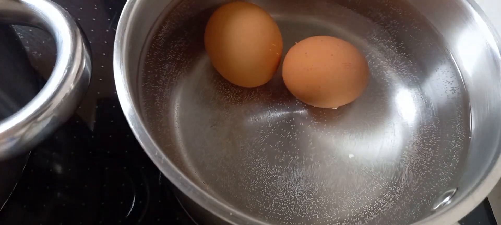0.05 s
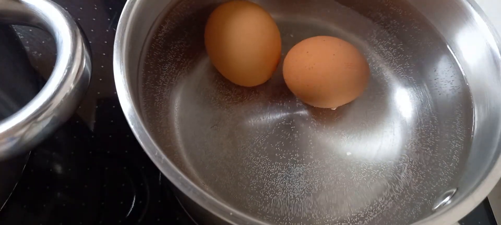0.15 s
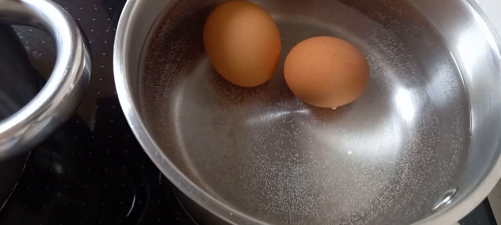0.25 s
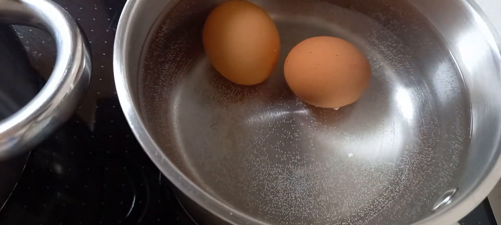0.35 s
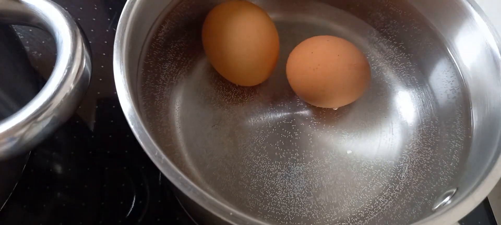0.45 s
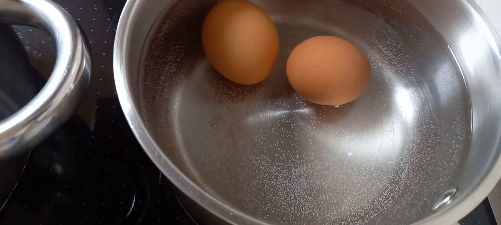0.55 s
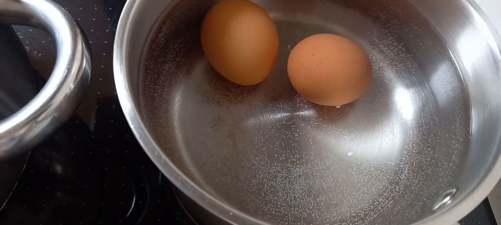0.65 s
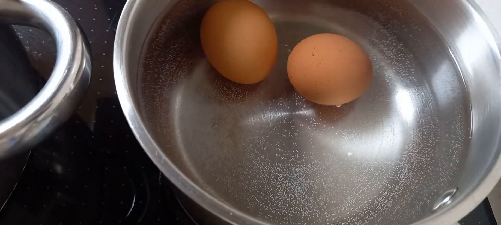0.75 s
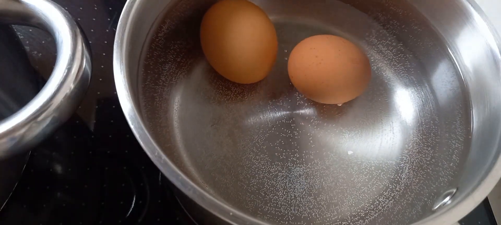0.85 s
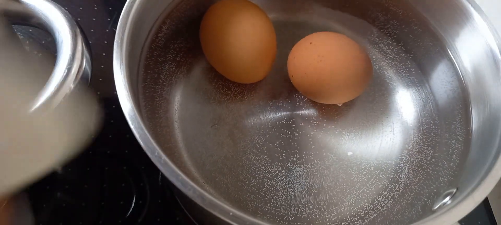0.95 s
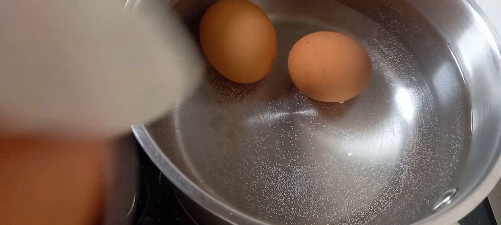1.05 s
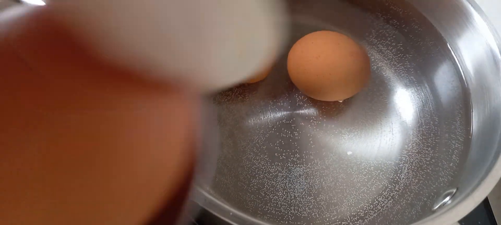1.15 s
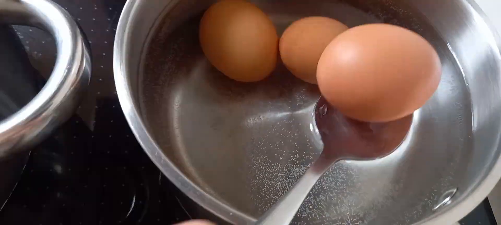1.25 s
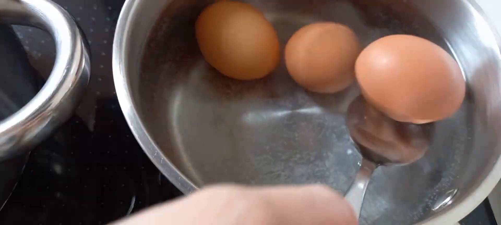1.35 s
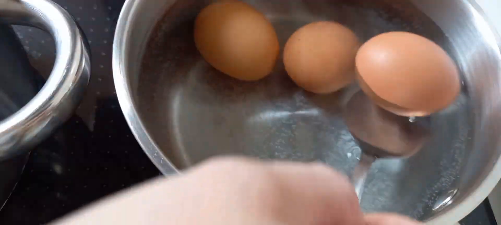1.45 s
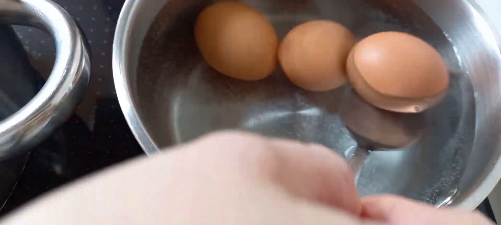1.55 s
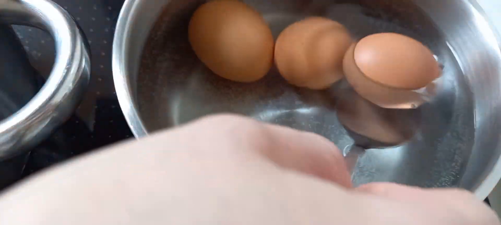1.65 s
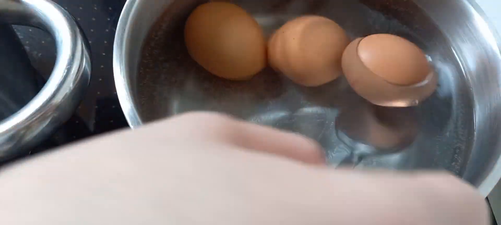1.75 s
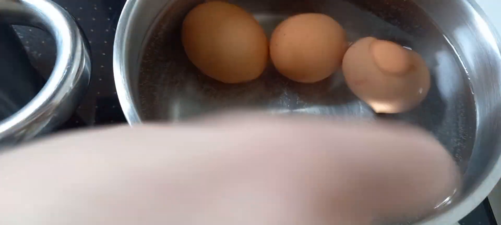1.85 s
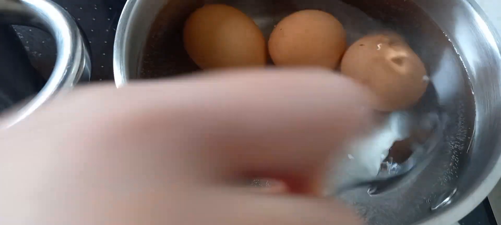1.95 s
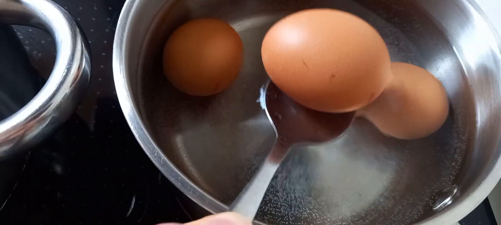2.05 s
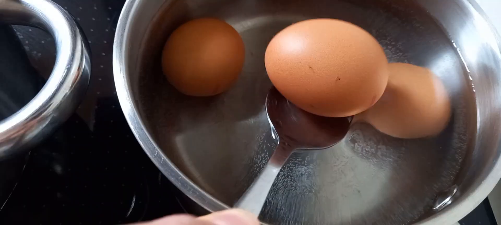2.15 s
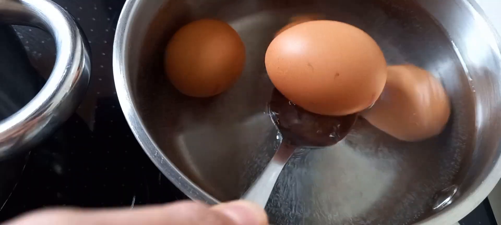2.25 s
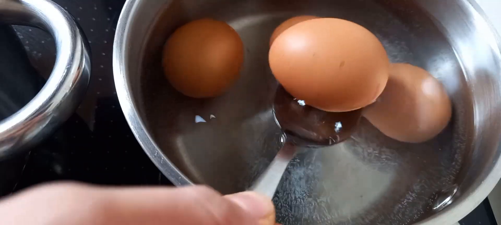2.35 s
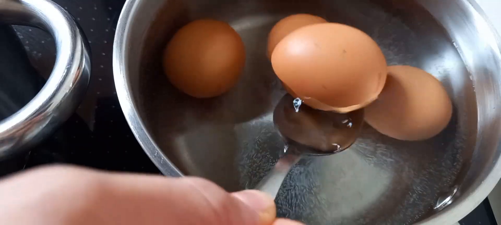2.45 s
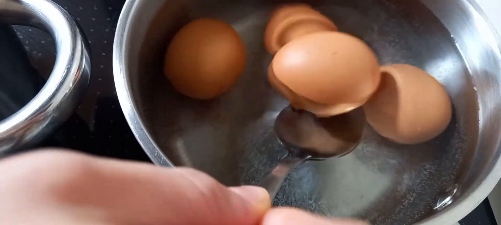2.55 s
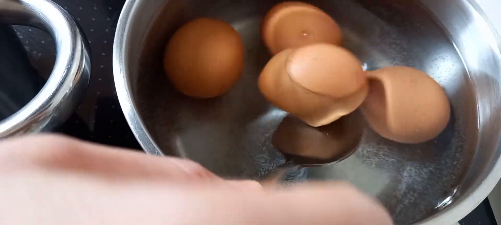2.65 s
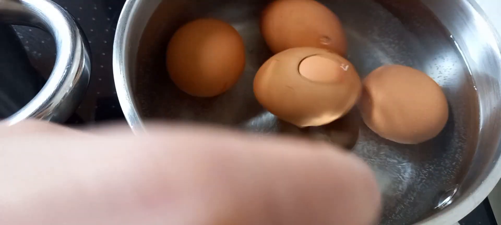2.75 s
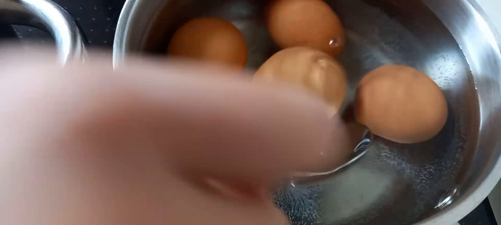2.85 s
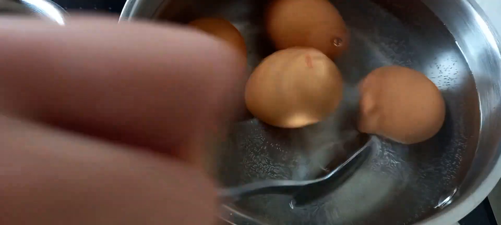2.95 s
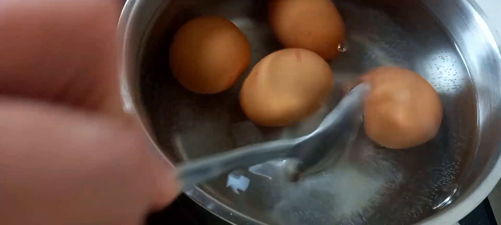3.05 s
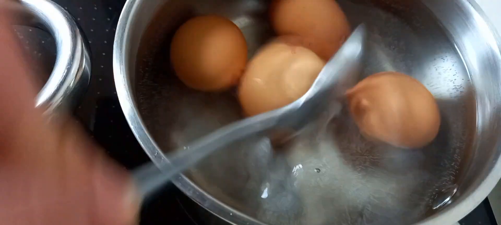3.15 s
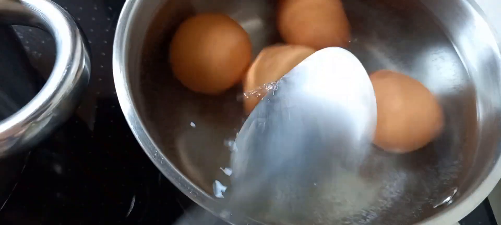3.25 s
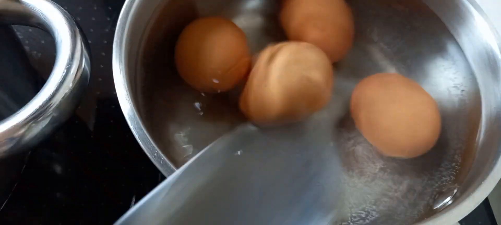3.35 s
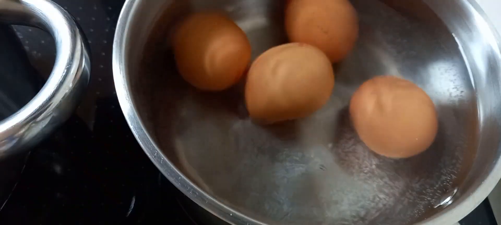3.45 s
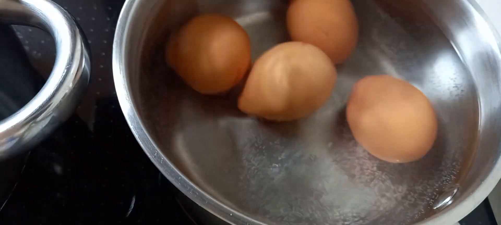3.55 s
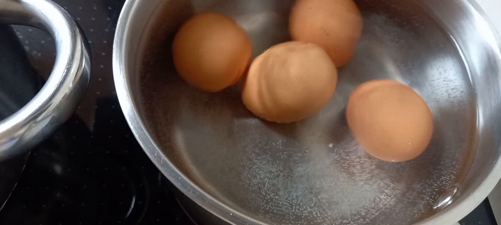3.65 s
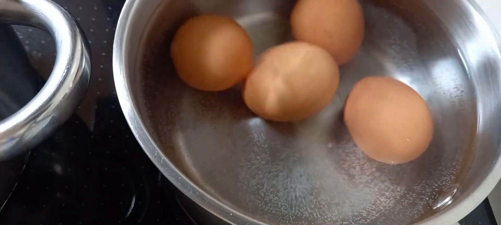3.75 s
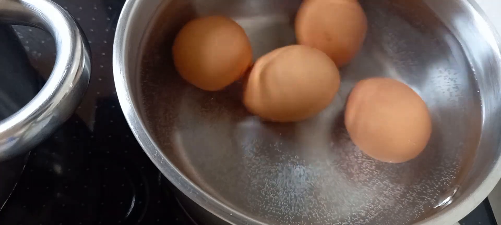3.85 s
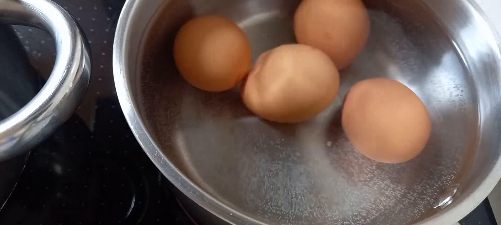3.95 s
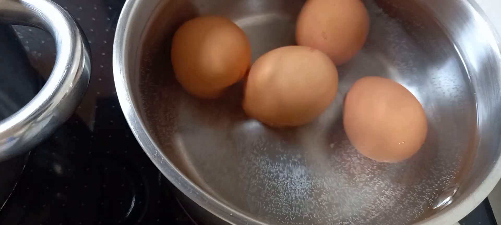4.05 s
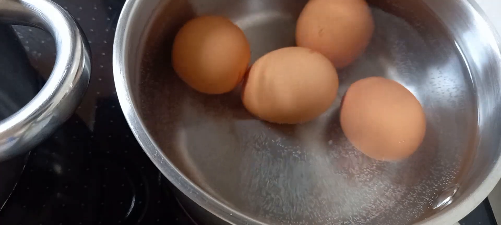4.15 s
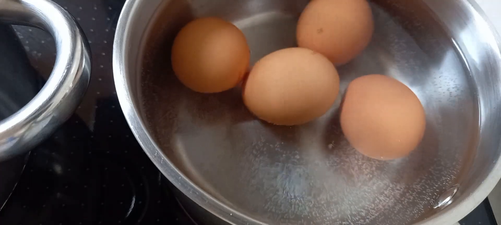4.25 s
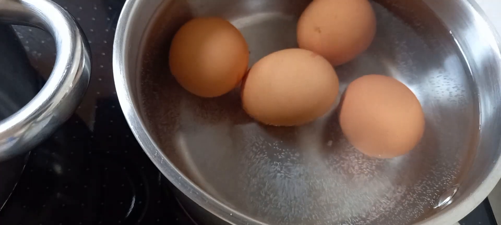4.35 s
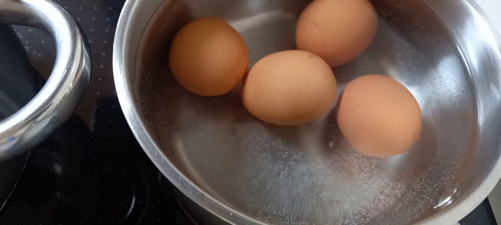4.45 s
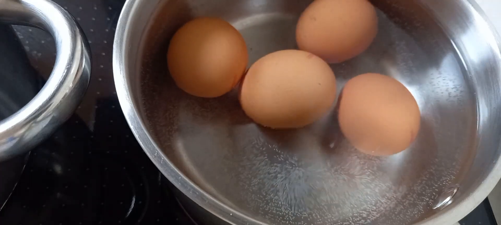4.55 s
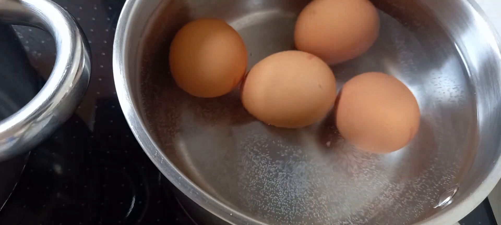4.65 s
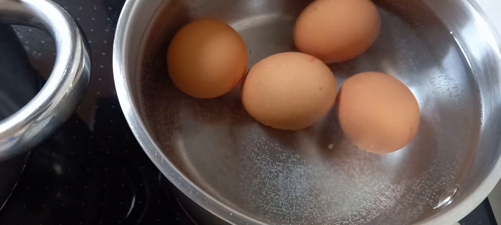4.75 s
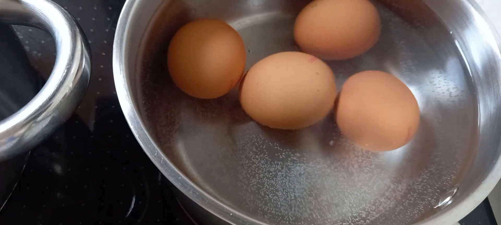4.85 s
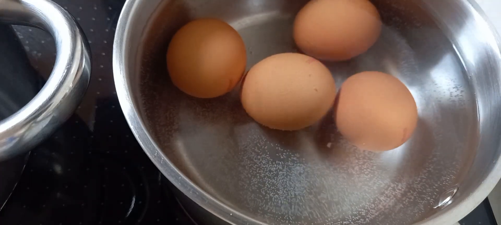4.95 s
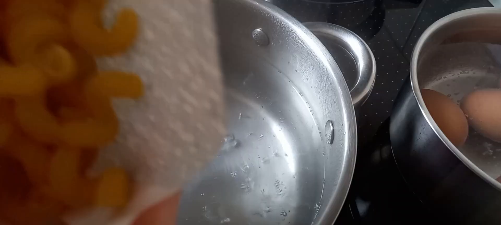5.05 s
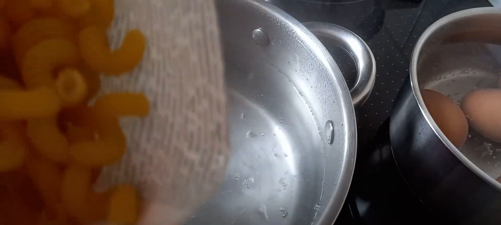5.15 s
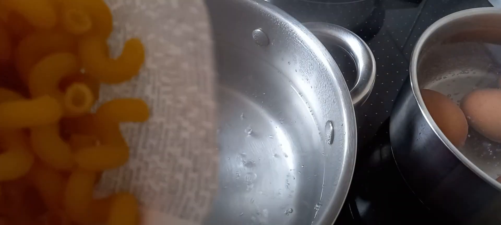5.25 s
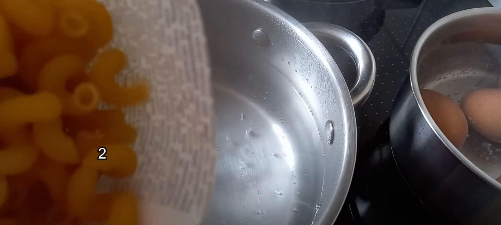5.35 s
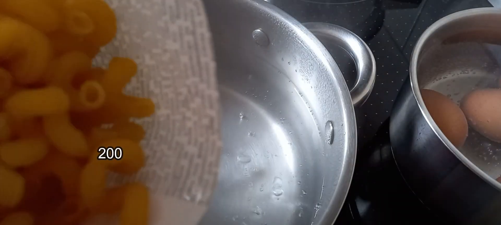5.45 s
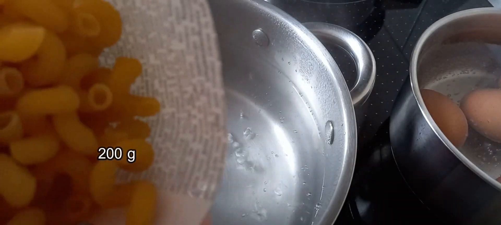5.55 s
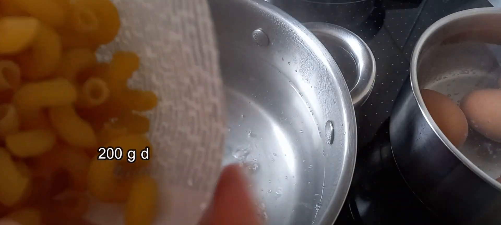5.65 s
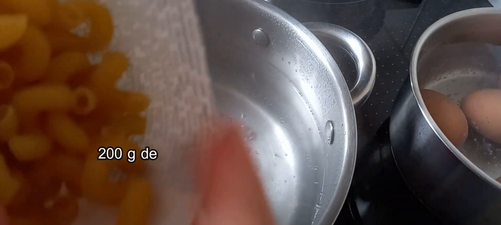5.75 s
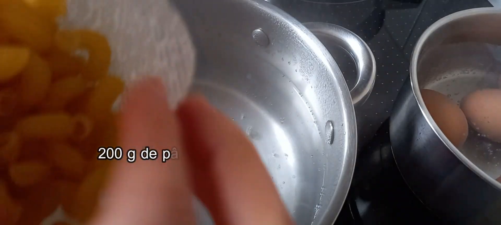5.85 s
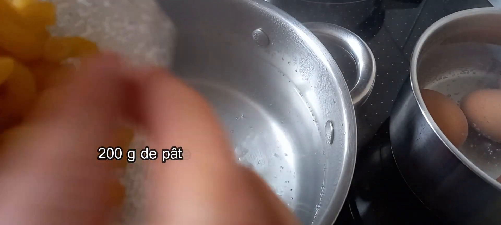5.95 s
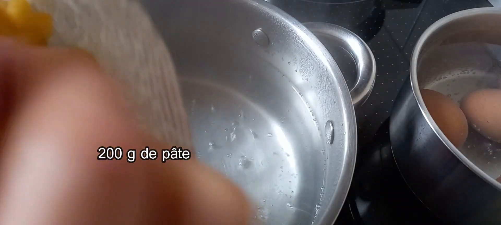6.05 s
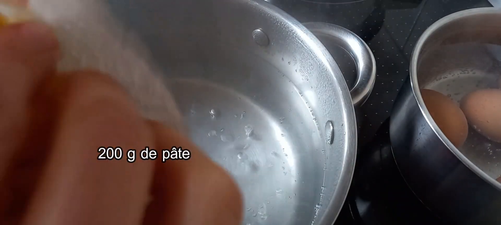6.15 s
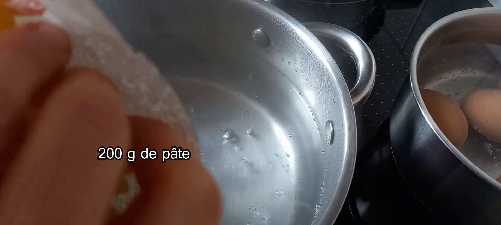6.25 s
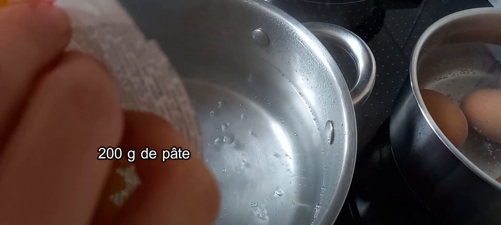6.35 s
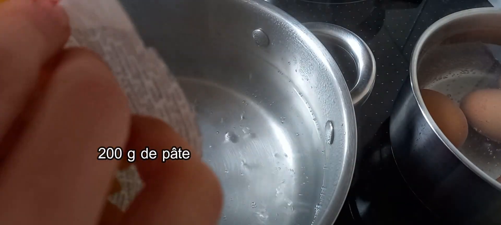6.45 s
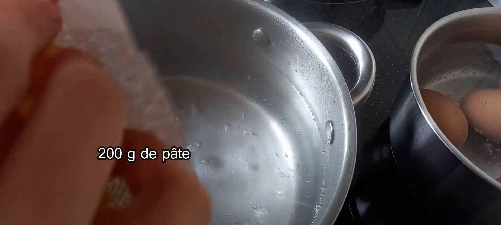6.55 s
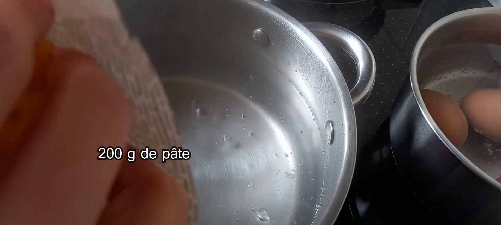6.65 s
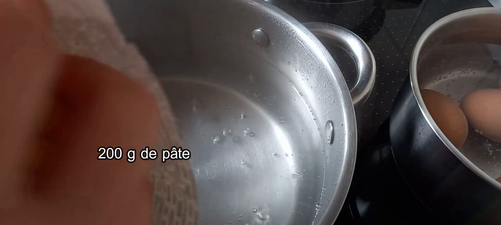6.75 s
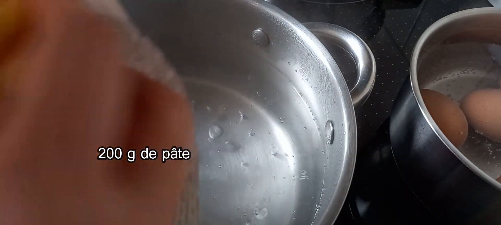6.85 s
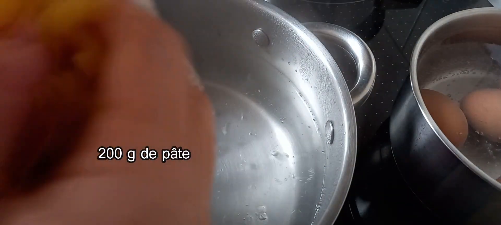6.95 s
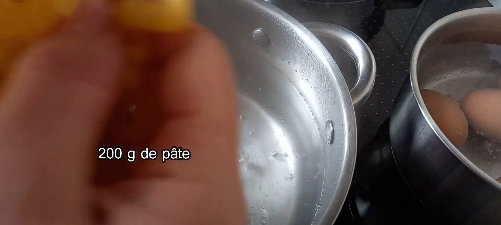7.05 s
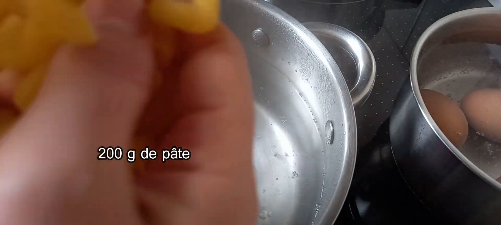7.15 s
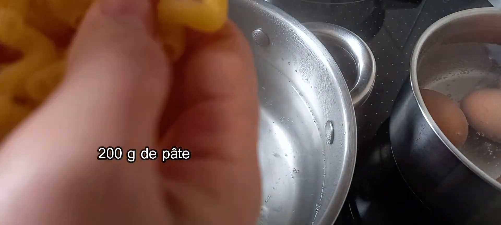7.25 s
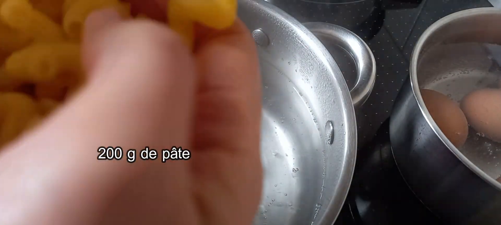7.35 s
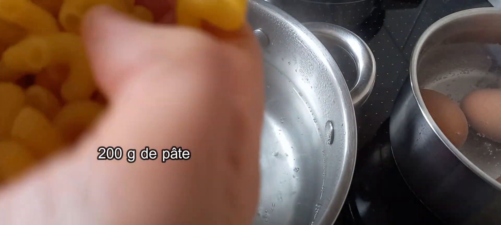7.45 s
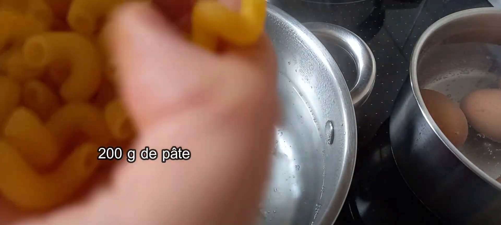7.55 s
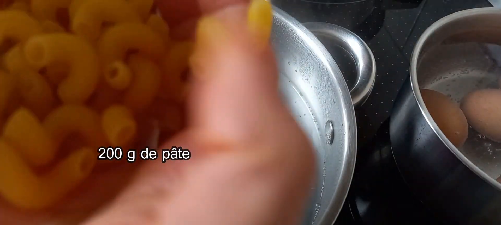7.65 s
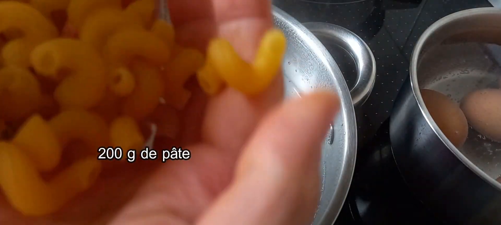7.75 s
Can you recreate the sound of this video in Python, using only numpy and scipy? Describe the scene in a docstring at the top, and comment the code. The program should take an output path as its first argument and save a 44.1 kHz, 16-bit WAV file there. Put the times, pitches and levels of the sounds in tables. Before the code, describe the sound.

Quiet kitchen: muffled egg clunks and faint water swishes in a saucepan, then abruptly a hand rummages noisily through a bag of dry macaroni.

```python
"""In a kitchen, eggs are lowered on a spoon into a steel saucepan of water: struck tones and clicks make
their knocks and the spoon's ticks, noise makes swishes and hiss, steady tones the hob's whine and a low hum.
Then, close by and to the left, a hand digs into a plastic bag of dry macaroni above an empty steel pot:
crowds of tiny resonant clicks make film and pasta crackle and rattle, sharper clicks make the film snap,
and the pot rings faintly along."""
import sys
import numpy as np
from scipy import signal
from scipy.fft import rfft, irfft
from scipy.io import wavfile
from scipy.ndimage import uniform_filter1d

SR = 44100
rng = np.random.default_rng(int(sys.argv[2]) if len(sys.argv) > 2 else 0)


def generate_wav(signal):
    """Clip the signal to [-1, 1] and save it as 16-bit WAV at the path in sys.argv[1]."""
    frames = np.transpose(np.atleast_2d(signal))
    scaled = np.clip(frames, -1, 1) * 32767
    pcm = np.round(scaled).astype(np.int16)
    wavfile.write(sys.argv[1], SR, pcm)


N = 343098
TIME = np.arange(N) / SR
AGE = TIME[:SR // 2]   # seconds since a sound began

EGGS_END_S, BAG_START_S = 5.089, 5.117

# The loudest clicks of the bag; the first is the abrupt start of the bag scene.
# Each row: start in seconds, peak level in dB, thump level in dB, treble boost or cut in dB.
LOUD_CLICKS = [(5.119, -11.5, -18, 16.5), (5.257, -6.5, -23, 8), (5.316, -0.5, -29, 2),
               (5.461, -17.5, -63, -29), (5.473, -10, -69, 13), (5.495, -11, -43, 0),
               (5.725, -10.5, -27, 4), (5.754, -10.5, -25, -5.5), (5.823, -7.5, -28, 0),
               (5.851, -5, -21, 1), (5.956, -16, -50, 4), (6.051, -7, -16, -5.5), (6.145, -2.5, -19.5, 4),
               (6.2, -10.5, -44, -1), (6.215, -6, -23, -10), (6.338, -2.5, -43, 1), (6.366, -6.5, -57, 2.5),
               (6.382, -8, -46, 16), (6.41, -8, -40, 0), (6.458, -8.5, -42, 1), (6.54, -2, -36, 12),
               (6.558, -2.5, -12, -32), (6.837, -10, -27, 20), (6.97, -6, -24, 24), (7.03, -11, -32, 14),
               (7.056, -11.5, -33, 10), (7.326, -2.5, -20.5, 1), (7.362, -7, -34, 8.5),
               (7.375, -5.5, -31, 12.5)]


def from_db(db):
    """Decibels to gain."""
    return 10 ** (np.asarray(db) / 20)


def rms_one(x):
    """Scale to unit power."""
    return x / np.sqrt(np.mean(x ** 2) + 1e-20)


def peak_one(x):
    """Scale to unit height."""
    return x / np.abs(x).max()


def in_time(rows):
    """Draw straight lines through (seconds, dB) points, with a value at every sample."""
    s, db = np.transpose(rows)
    return np.interp(TIME, s, db)


def dying(t60):
    """Envelope that falls 60 dB in t60 seconds."""
    return np.exp(-np.log(1000) * AGE / max(t60, 1e-4))


def swell(s, length, attack_s, release_s):
    """Rise from time s, hold until length has passed, then fall 60 dB in release_s."""
    rise = np.clip((TIME - s) / max(attack_s, 1e-4), 0, 1)
    fall = np.clip((TIME - s - length) / max(release_s, 1e-4), 0, 2)
    return rise * np.exp(-np.log(1000) * fall)


def drift(rate):
    """Random wandering of spread 1 with about `rate` turns a second."""
    return rms_one(np.interp(TIME * rate, np.arange(4096), rng.standard_normal(4096)))


def through(x, response):
    """Convolve, keeping the length."""
    full = signal.fftconvolve(np.atleast_2d(x), np.atleast_2d(response), axes=-1)
    return full[:, :x.shape[-1]]


def colour(x, points, size=4096):
    """Filter through (Hz, dB) points without sounding ahead of time (minimum phase)."""
    hz, db = np.transpose(points)
    grid = np.maximum(np.arange(size // 2 + 1) * SR / size, 1)
    gain = from_db(np.interp(np.log(grid), np.log(hz), db))
    # fold the cepstrum onto positive times
    cepstrum = irfft(np.log(gain))
    cepstrum[1:size // 2] *= 2
    cepstrum[size // 2 + 1:] = 0
    return through(x, irfft(np.exp(rfft(cepstrum)))).reshape(x.shape)


def resonate(x, hz, width_hz):
    """Band resonance with gain about 1 on top."""
    r = np.exp(-np.pi * width_hz / SR)
    top = np.array([1, 0, -1]) * (1 - r * r) / 2
    bottom = [1, -2 * r * np.cos(2 * np.pi * hz / SR), r * r]
    return signal.lfilter(top, bottom, x + 1e-18)


def struck(modes):
    """One blow: every mode rings and dies at its own pace, with a slightly different strength each time."""
    return sum(from_db(db + 2 * rng.normal()) * np.sin(2 * np.pi * hz * AGE) * dying(t60)
               for hz, db, t60 in modes)


def crack(t60, grit):
    """A sharp click followed by a brief gritty splinter of noise."""
    return (AGE == 0) + grit * rng.standard_normal(len(AGE)) * dying(t60)


def sides(pan_db):
    """Left and right gains that differ by pan_db; positive leans left."""
    return from_db(np.array([[pan_db], [-pan_db]]) / 2)


def add(out, s, sound):
    """Mix a sound in at time s."""
    i = round(s * SR)
    out[..., i:i + sound.shape[-1]] += sound[..., :N - i]


def later(x, s):
    """Delay by s seconds."""
    return np.pad(x, (max(round(s * SR), 0), 0))[:len(x)]


def kitchen(x, early_db, early_t60):
    """Dense near reflections from pan, hob and wall plus a room tail, as decaying noise of unit energy."""
    near, far = rng.standard_normal((2, 2, len(AGE)))
    tail = colour(far, [(100, 7), (500, 3.5), (6000, 6.0), (16000, -6.0)]) * dying(t60=0.27)
    early = from_db(early_db) * near * dying(early_t60)
    response = (tail + early) * (AGE > .002)
    return through(x, rms_one(response) / np.sqrt(len(AGE)))


def hob():
    """A thin wavering tone whines, filtered noise makes a faint high hiss and the air of the room."""
    # Level of the faint high hiss, which drops after louder sounds.
    # Each row: time in seconds, level in dB before a 7 dB lift.
    hiss_level = [(0.0, -94.5), (0.93, -83.5), (1.19, -83), (1.41, -93.5), (3.07, -92), (3.61, -84),
                  (4.05, -83), (4.21, -89.5), (5.05, -84.5)]
    # Tone of the hiss. Each row: frequency in Hz, relative level in dB.
    hiss_tone = [(2000, -12.5), (6000, -18.5), (7000, -13.5), (8200, -4), (9500, -12), (11000, -14.5),
                 (16000, -16.5)]
    # Tone of the room's air. Each row: frequency in Hz, relative level in dB.
    air_tone = [(18, -67), (30, -19.5), (87, 3.5), (162, -11), (241, -10.5), (747, -27), (816, -17.5),
                (1480, -28.5), (1730, -25.5), (1980, -34), (6000, -44.5), (7800, -60), (13200, -120)]
    rise = np.clip((TIME - 1.23) / 0.53, .2, 1)   # the whine waits at a fifth of its strength, then grows
    whine_turn = 2 * np.pi * np.cumsum(1790 + 3 * drift(40)) / SR   # around 1790 Hz
    whine = rise * from_db(-81.5 + 2.6 * drift(13)) * np.sin(whine_turn)
    hiss = from_db(in_time(hiss_level) + 7) * rms_one(colour(rng.standard_normal((2, N)), hiss_tone))
    air_noise = rng.standard_normal((2, N)) + 0.77 * rng.standard_normal(N)   # partly shared by both sides
    air = from_db(-67) * rms_one(colour(air_noise, air_tone))
    return whine + hiss + air


def hum():
    """A low wavering tone with a weak octave swells and fades; the strongest swell sets its pitch."""
    # The swells. Each row: start in seconds, length in seconds, frequency in Hz, level in dB.
    hum_rows = [(0.0, .15, 70.6, -48), (0.146, 0.54, 66, -54), (0.413, 0.13, 66, -49),
                (1.627, 0.29, 76.5, -56.5), (2.047, 1.27, 86.6, -58), (2.868, 0.36, 85.4, -50)]
    swells = np.array([from_db(db) * swell(s, length, attack_s=0.026, release_s=.3)
                       for s, length, hz, db in hum_rows])
    hz = np.array(hum_rows)[swells.argmax(axis=0), 2]
    turn = 2 * np.pi * np.cumsum(hz) / SR
    level = swells.max(axis=0) * from_db(2 * drift(8))
    octave = from_db(-16.5 + 3 * drift(28.0)) * np.sin(2 * turn)
    return level * (np.sin(turn) + octave)


def swishes_and_bump():
    """Water swishes, and near 4.1 s a soft low bump: all noise bands that swell fast and ebb slowly."""
    # Each row: start in seconds, length in seconds, centre in Hz, level in dB before the swell shapes it.
    noise_bands = [(0.982, 0.14, 9100, -70), (1.31, 0.052, 7700, -67), (1.343, 0.12, 3270, -71.5),
                   (1.351, 0.096, 1670, -72), (1.38, 0.29, 222, -69.5), (1.60, 0.23, 400, -54.5),
                   (1.88, 0.047, 2080, -73), (2.011, 0.059, 1860, -55.5), (2.014, 0.082, 380, -47),
                   (4.095, 0.15, 595, -57), (4.122, 0.13, 102, -44.5), (4.519, 0.25, 1750, -72.5)]
    out = np.zeros((2, N))
    for s, length, hz, db in noise_bands:
        noise = rng.standard_normal((2, len(AGE)))
        band = resonate(resonate(noise, hz, 0.47 * hz), hz, 1.64 * hz)
        surge = np.sin(np.pi * np.clip(AGE / length, 0, 1) ** 0.35)
        add(out, s, from_db(db) * rms_one(band) * surge)
    return out


def handle():
    """The spoon's thin handle, set ringing as it touches the pan, hums on in two dying tones."""
    # Tones of the handle. Each row: frequency in Hz, typical level in dB, time to fall 60 dB in seconds.
    handle_modes = [(470, -59, .42), (549, -61, .42)]
    out = np.zeros(N)
    add(out, 1.890, struck(handle_modes))
    return out


def spoon():
    """Light ticks of spoon and shells: small hard contacts, each with its own resonance."""
    # The ticks. Each row: start in seconds, peak level in dB before panning, centre in Hz,
    # top-octave level in dB, left-right difference in dB, room share in dB before a 10 dB lift.
    ticks = [(0.774, -39.5, 2570, -6, 6.5, -17), (0.773, -42, 3520, 11, -3, -12.5),
             (1.272, -46, 8730, -3.5, 9, -16), (1.352, -59.5, 1610, -20, -4, -4),
             (2.2216, -36, 7400, -9, -1.5, -34), (2.222, -38.5, 1070, -16, -1, -16),
             (2.268, -38, 4120, -16, 0, -26), (4.132, -39.5, 10300, 12, 1, -2.5),
             (4.507, -36, 4830, 10, 0, -4), (4.52, -42.5, 1700, 4, -1, 3)]
    # Basic tone of a tick. Each row: frequency in Hz, relative level in dB.
    tick_tone = [(600, -10), (1150, 0), (2000, -5), (3000, -2.5), (8000, 2), (13000, -2), (16000, -3.5)]
    direct, sent = np.zeros((2, 2, N))
    for s, db, hz, top_db, pan_db, room_db in ticks:
        click = colour(np.array([crack(t60=0.024, grit=0.3) for side in range(2)]), tick_tone)
        click = colour(click, [(8000, 0.014), (13000, top_db)])
        click = click + 3.8 * resonate(click, hz, width_hz=150)
        tick = from_db(db) * peak_one(click) * sides(pan_db)
        add(direct, s, tick)
        add(sent, s, tick * from_db(room_db + 10.0))
    return direct + kitchen(sent, early_db=12, early_t60=0.027)


def bounces(s, gap):
    """Times of a landing and of its ever quicker bounces, until the egg rests."""
    if gap <= .012:   # seconds
        return [s]
    return [s] + bounces(s + gap, gap * .42)


def eggs():
    """An egg meets the pan: the shell clicks, the water-loaded floor swells into a short note, the pan thuds."""
    # Landings on the pan floor. Each row: start in seconds, time to first bounce in seconds,
    # ring level in dB before panning, ring change per bounce in dB, first thud level in dB,
    # first shell click level in dB, left-right difference of the ring in dB.
    knocks = [(1.598, 0.0021, -58, 0, -47.5, -39.5, -12), (1.651, .025, -41, -3, -46, -37.5, 11),
              (1.72, .022, -44, -2.5, -53, -52, 7), (1.889, 0, -55.5, 0, -49, -58, 11),
              (2.016, 0.053, -41, -15, -44.5, -37.5, 7), (2.272, 0, -56, 0, -54.5, -43, 11),
              (2.513, 0.055, -47.5, 1, -40, -36, 13), (2.62, 0, -47.5, 0, -57, -48.5, 3),
              (2.965, 0, -23.5, 0, -54, -33.5, 6.5), (3.033, 0, -51, 0, -59, -53, -6),
              (3.102, 0.082, -28.5, -7, -56, -42.5, 6), (4.134, 0, -57.5, 0, -48, -54, -21)]
    # Saucepan with water in it. Each row: frequency in Hz, relative level in dB, time to fall 60 dB in seconds.
    pan_modes = [(640, -18.5, 0.078), (790, -6, 0.051), (847.5, 13, 0.051), (921, -12, .08),
                 (985, -17, 0.12), (1240, -23.5, 0.049), (1480, -30.5, 0.084), (1736, -21, 0.051),
                 (2270, -30.5, 0.07), (3015, -32, 0.082), (3910, -41.5, 0.059), (5200, -44, 0.052),
                 (6100, -41.5, 0.022)]
    # Saucepan rocking on the hob. Each row: frequency in Hz, relative level in dB,
    # time to fall 60 dB in seconds.
    thud_modes = [(111.8, -2.5, 0.096), (137, -8.5, 0.17), (234, -1, 0.1), (273.5, -6.5, 0.13),
                  (380, -27.5, 0.12), (444, -14, 0.074)]
    # Tone of the shell's click. Each row: frequency in Hz, relative level in dB.
    shell_tone = [(600, 8), (1200, 2), (1550, 8), (1900, -10), (3000, -11), (4500, -9), (8000, -8),
                  (11000, -19), (16000, -36)]
    out = np.zeros((2, N))
    for start, gap, ring_db, change_db, thud_db, click_db, pan_db in knocks:
        for k, s in enumerate(bounces(start, gap)):
            note = peak_one(struck(pan_modes) * (1 - np.exp(-AGE / 0.0019)))
            thud = peak_one(struck(thud_modes) * (1 - np.exp(-AGE / 0.0089)))
            splinters = np.array([crack(t60=0.013, grit=1.0) for side in range(2)])
            click = peak_one(colour(splinters, shell_tone))
            add(out, s, from_db(ring_db + k * change_db) * note * sides(pan_db))
            weaker = from_db(-k * 11.5)   # thud and click lose 11.5 dB with every bounce
            add(out, s, weaker * (from_db(thud_db) * thud + from_db(click_db) * click))
    return out + from_db(-3) * kitchen(out, early_db=18.0, early_t60=0.046)


def from_the_left(x):
    """Each spot on the bag reaches the right side late, and once more off the pot's wall, by paths of its own."""
    direct_s = .00046 + .00007 * rng.normal()
    bounce_s = .0013 + .00016 * rng.normal()
    return np.array([x, 0.54 * later(x, direct_s) + 0.73 * later(x, bounce_s)])


def grains(per_s, spread_db, clump_db, low_hz, high_hz, cycles, count=18):
    """Clumps of tiny contacts, each dealt to one of many short resonances; the slow level is mostly evened out."""
    chance = per_s * from_db(clump_db * drift(130)) / SR
    born = np.flatnonzero(rng.random(N) < chance)
    sizes = from_db(spread_db * np.minimum(rng.exponential(1, N), 4)) * rng.choice([-1, 1], N)
    clicks = np.zeros((count, N))
    clicks[rng.integers(0, count, N)[born], born] = sizes[born]
    pitches = np.geomspace(low_hz, min(high_hz, .45 * SR), count)
    out = sum(from_the_left(resonate(row, hz, hz / cycles)) for row, hz in zip(clicks, pitches))
    slow_power = uniform_filter1d(out[0] ** 2, SR // 20)
    return out / np.maximum(slow_power, 1e-12) ** .4


def effort():
    """How hard the hand works in the bag, in dB about its mean."""
    # Each row: time in seconds, effort in dB (only its swing about the mean counts).
    effort_curve = [(5.18, -51), (5.29, -43), (5.37, -41), (5.52, -57.5), (5.76, -50), (5.92, -51),
                    (6.13, -34.5), (6.27, -37), (6.73, -39), (6.87, -31.5), (7.24, -37.5), (7.37, -57),
                    (7.63, -48), (7.78, -49)]
    db = in_time(effort_curve)
    return db - db[TIME > BAG_START_S].mean()


def stirring():
    """Strength of rumble, rattle and crackle: steady stirring that follows the effort, with shoves on top."""
    # The hand shoves the heap. Each row: start in seconds, length in seconds,
    # rumble level in dB, pasta rattle level in dB, film crackle level in dB.
    shoves = [(5.112, 0.033, -40.5, -41.5, -45.5), (5.305, 0.065, -29.5, -32.5, -40),
              (5.72, 0.09, -39, -38, -47), (5.829, 0.056, -32, -31.5, -39),
              (6.041, 0.024, -26, -31.5, -44.5), (6.255, 0.097, -29.5, -35.5, -39.5),
              (6.37, 0.1, -34.5, -34, -61), (6.551, 0.044, -27.5, -27, -35.5),
              (6.635, 0.079, -23.5, -29, -24.5), (6.752, 0.061, -29, -25, -21.5),
              (6.904, 0.18, -37, -33.5, -36.5), (7.161, 0.072, -43, -62, -32.5),
              (7.257, 0.075, -35, -52, -37.5), (7.45, 0.14, -47.5, -66, -60),
              (7.553, 0.14, -34.5, -39.5, -39.5)]
    work_db = effort()
    # level in dB at mean effort, plus a share of the effort's swing
    power = from_db([-42.5 + 0.64 * work_db,           # rumble
                     -45.5 + 0.82 * work_db,           # rattle
                     -47 + 1.2 * work_db]) ** 2        # crackle
    for s, length, *levels_db in shoves:
        shape = swell(s, length, attack_s=0.0087, release_s=0.19)
        power += np.outer(from_db(levels_db), shape) ** 2
    return np.sqrt(power)


def strain(spread_s):
    """Crinkling builds around each of the loudest clicks and dies away just after it."""
    out = np.zeros(N)
    for s, db, *rest in LOUD_CLICKS:
        # strongest 2 ms after the listed time
        add(out, s - .05, from_db(db) * np.exp(-np.abs(AGE - .052) / spread_s))
    return out


def digging():
    """The heap shifts and rumbles, macaroni rub and clack together, the film crackles: all crowds of clicks."""
    # Tone of the heap's rumble. Each row: frequency in Hz, relative level in dB.
    bulk_tone = [(25, -20), (55, -6.5), (95, -3), (150, -3.5), (195, -6), (235, -3), (280, -7), (400, -15),
                 (700, -20.5), (1500, -21)]
    # Tone of the pasta's rattle. Each row: frequency in Hz, relative level in dB.
    rattle_tone = [(150, -21.5), (420, -0.5), (700, 2), (1100, -1), (2000, -5.5), (3200, -7.5),
                   (4500, -14.5), (8000, -25)]
    # Tone of the film's crackle. Each row: frequency in Hz, relative level in dB.
    crackle_tone = [(1500, -21), (3500, -2), (5000, 0.5), (6600, -1.5), (7700, 1), (9200, 0.5),
                    (10000, -4.5), (13000, -5), (16000, -7.5)]
    bulk_gain, rattle_gain, crackle_gain = stirring()
    crinkle = strain(spread_s=0.0019)
    bulk = grains(per_s=990, spread_db=0.5, clump_db=2.5, low_hz=66, high_hz=800, cycles=0.97)
    rubbing = grains(per_s=750, spread_db=4.2, clump_db=5.5, low_hz=430, high_hz=5500, cycles=2.4)
    clacks = grains(per_s=90, spread_db=4, clump_db=3, low_hz=900, high_hz=3400, cycles=6, count=12)
    rattle = rms_one(rubbing) + from_db(-3) * rms_one(clacks)
    crackle = grains(per_s=2200, spread_db=4.6, clump_db=6, low_hz=3000, high_hz=16000, cycles=3.2)
    rattle_gain = rattle_gain + from_db(-26.0) * crinkle
    crackle_gain = crackle_gain + from_db(-23.0) * crinkle
    return (bulk_gain * rms_one(colour(bulk, bulk_tone))
            + rattle_gain * rms_one(colour(rattle, rattle_tone))
            + crackle_gain * rms_one(colour(crackle, crackle_tone)))


def small_snaps():
    """Small creases snap at random, louder with more effort; rows have the same columns as LOUD_CLICKS."""
    per_s = 14
    slots = np.arange(BAG_START_S, TIME[-1] - 2 / per_s, 1 / per_s)
    s = slots + rng.random(len(slots)) / per_s   # one somewhere in each slot
    size, brightness = rng.standard_normal((len(s), 2)).T
    db = -23 + 0.66 * np.interp(s, TIME, effort()) + 4 * size
    thump_db = db - 15
    treble_db = -8 + 1.5 * brightness
    return list(zip(s, db, thump_db, treble_db))


def snaps():
    """A crease flips out and back with a crack, its fold rings and the full bag thumps; the start sounds alike."""
    # Tone of a snap. Each row: frequency in Hz, relative level in dB.
    snap_tone = [(25, -23), (100, -4), (400, 12), (1000, 10), (2000, 3), (3500, 1.5), (8000, -0.5),
                 (12000, -3.5), (16000, -7)]
    # The full bag as a drum. Each row: frequency in Hz, relative level in dB, time to fall 60 dB in seconds.
    bag_modes = [(108, -43, 0.19), (143, -2.5, 0.043), (227, 3, 0.027), (310, -16, 0.016), (483, 2, 0.021)]
    out = np.zeros((2, N))
    for s, db, thump_db, treble_db in list(LOUD_CLICKS) + small_snaps():
        click = colour(crack(t60=0.0063, grit=0.39), snap_tone)
        click = click - 0.89 * later(click, rng.uniform(.0001, 0.00032))   # the film springs back
        click = click + resonate(click, rng.uniform(1100, 3200), width_hz=260)   # the fold rings
        click = colour(click, [(2000, 0), (7000, treble_db)])   # brighter or duller
        add(out, s + 0.00124, from_the_left(from_db(db) * peak_one(click)))
        add(out, s + .0016, from_the_left(from_db(thump_db) * peak_one(struck(bag_modes))))
    return out


def bag():
    """The bag sounds close on the left, shaded on the right; the pot rings and the kitchen echoes along."""
    # The empty pot. Each row: frequency in Hz, relative level in dB, time to fall 60 dB in seconds.
    pot_modes = [(708, 20.5, 0.023), (1590, -32, .13), (1710, -18, .1), (2680, -10, 0.092), (3772, 14, 0.1),
                 (7575, -8, 0.14), (8160, 7, 0.17), (7957, -3, 0.12), (9100, -7, 0.12), (10200, 2, 0.18)]
    # The right side is shaded from the bag. Each row: frequency in Hz, level in dB.
    shade = [(60, -16), (110, -6), (230, -14), (400, -16), (650, -2), (1100, -12), (2800, -4.5), (5500, -8),
             (7500, -4), (9200, -7.5), (16000, -8)]
    low_cut = signal.butter(2, 55, "high", fs=SR, output="sos")
    left, right = signal.sosfilt(low_cut, digging() + snaps())
    pot = through(left, np.array([struck(pot_modes) for side in range(2)]))
    room = kitchen(left, early_db=22, early_t60=0.019)
    close = np.array([left, colour(right, shade)])
    return close + from_db(-71.0) * pot + from_db(-13.0) * room * sides(4.8)


def scene():
    """First the eggs, then, after a moment of silence, the pasta."""
    saucepan = eggs() + swishes_and_bump() + spoon() + handle() + hum() + hob()
    return saucepan * (TIME < EGGS_END_S) + bag() * (TIME > BAG_START_S)


def record(dry):
    """The highest peaks are clipped at full scale, then everything above 15900 Hz is cut steeply."""
    top_cut = signal.ellip(10, .2, 80, 15900, fs=SR, output="sos")
    return signal.sosfilt(top_cut, np.clip(dry, -1, 1))


dry = scene()
out = record(dry)
generate_wav(out)
```